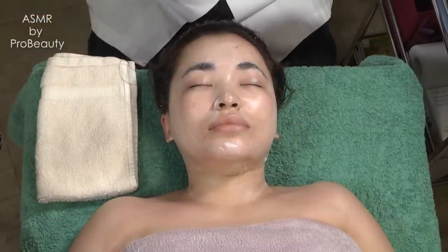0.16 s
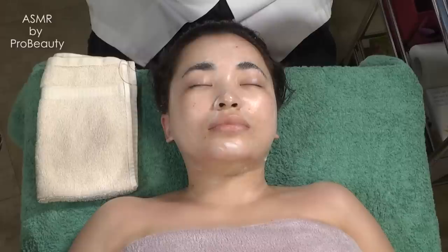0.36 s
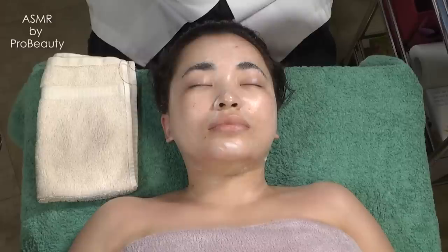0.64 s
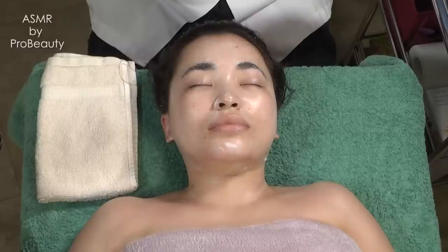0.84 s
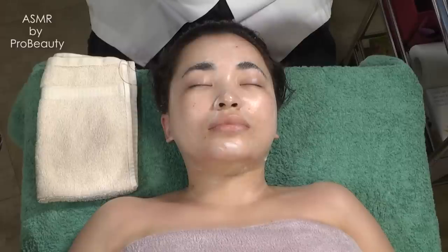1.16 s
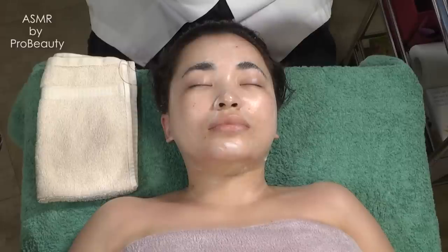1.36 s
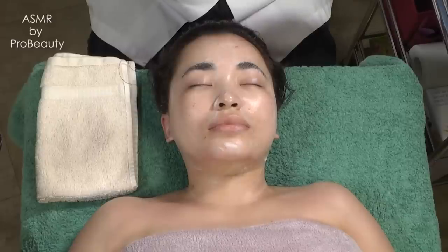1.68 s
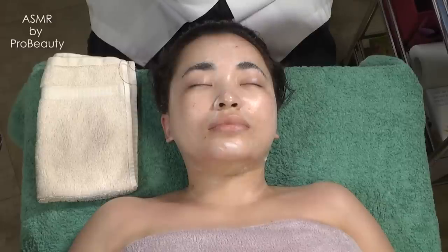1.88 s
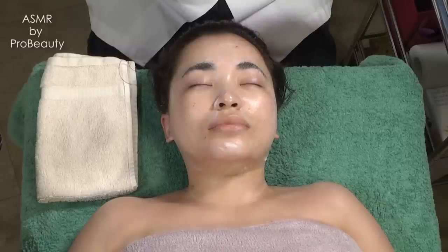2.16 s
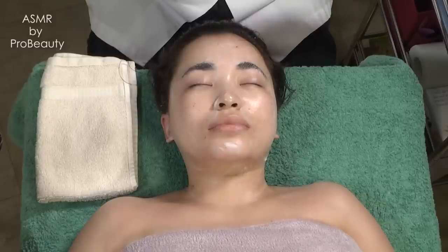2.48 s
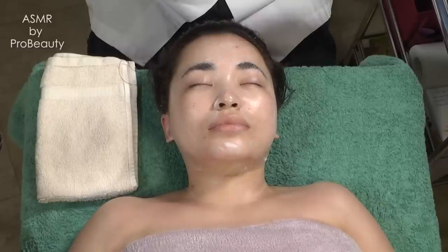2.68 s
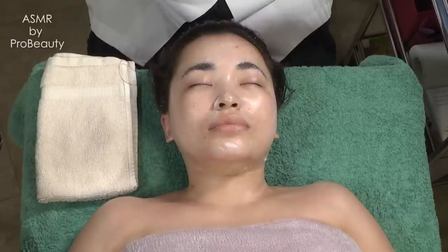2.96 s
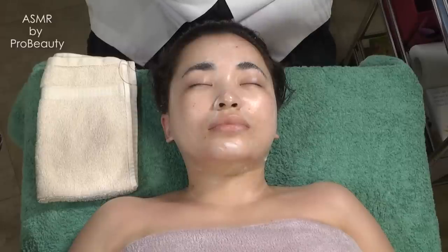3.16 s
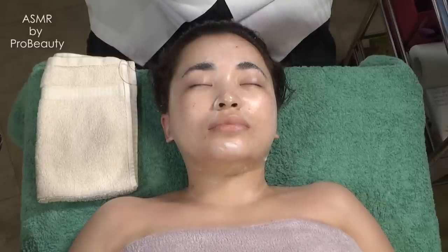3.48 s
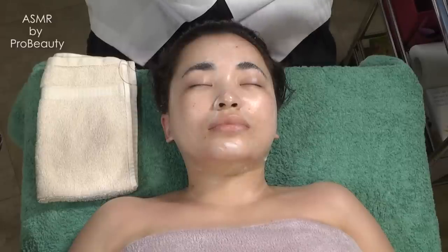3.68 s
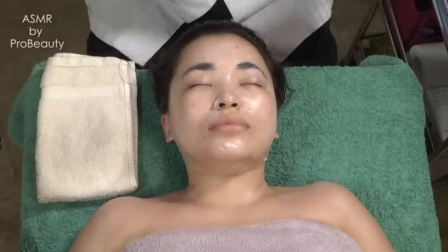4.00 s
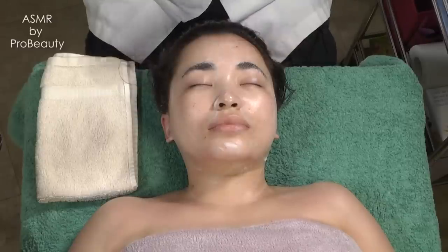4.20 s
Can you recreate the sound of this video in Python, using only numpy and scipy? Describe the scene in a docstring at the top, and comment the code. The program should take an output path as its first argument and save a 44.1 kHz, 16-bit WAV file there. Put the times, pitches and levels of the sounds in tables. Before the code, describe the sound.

In a quiet, hard-walled room, a few faint drips and a soft swirl come first. Then wet sponges are squeezed over a basin, right of centre: sharp foam snaps, ringing drops and fine fizz in a dense cluster. It thins and stops, and a cotton coat rustles close by over low ventilation rumble and microphone hiss.

```python
"""Wet sponges squeezed over a basin

Wet sponges are squeezed out to the right, in a quiet hard room. Drops splat and leave ringing bubbles,
pockets close with a rising sine, swirling water is ticks through a sliding resonance; foam snaps and crackles.
Basin bounces, a far-wall echo and a diffuse tail surround the water.
A cotton coat rustles as shaped noise, with two dull bumps, over steady ventilation rumble and hiss."""
import sys
import numpy as np
from scipy import signal
from scipy.fft import rfft, irfft, next_fast_len
from scipy.io import wavfile
from scipy.ndimage import uniform_filter1d

SR = 44100
rng = np.random.default_rng(int(sys.argv[2]) if len(sys.argv) > 2 else 0)


def generate_wav(signal):
    """Clip the signal to [-1, 1] and save it as 16-bit WAV at the path in sys.argv[1]."""
    frames = np.transpose(np.atleast_2d(signal))
    scaled = np.clip(frames, -1, 1) * 32767
    pcm = np.round(scaled).astype(np.int16)
    wavfile.write(sys.argv[1], SR, pcm)


N = 191173


def gain_of(db):
    """Decibels to amplitude factor."""
    return 10 ** (np.asarray(db) / 20)


def evened(x):
    """Scale to unit RMS."""
    return x / np.sqrt(np.mean(x ** 2) + 1e-30)


def read(points, hz, axis=1):
    """Read one table column over log frequency."""
    rows = np.transpose(points)
    return np.interp(np.log(hz + 1), np.log(rows[0] + 1), rows[axis])


def add(mix, start_s, sound):
    """Mix a sound in place, cut at the end of the mix."""
    part = mix[round(start_s * SR):][:len(sound)]
    part += sound[:len(part)]


def coloured(x, points, scale=1):
    """Zero-phase filter following a (Hz, dB) curve."""
    size = next_fast_len(N)
    gain = gain_of(scale * read(points, np.fft.rfftfreq(size, 1 / SR)))
    return irfft(rfft(x, size) * gain, size)[..., :N]


def delayed(x, delay_s):
    """Fractional delay as a linear phase slope."""
    size = next_fast_len(N)
    phase = np.exp(-2j * np.pi * np.fft.rfftfreq(size, 1 / SR) * delay_s)
    return irfft(rfft(x, size) * phase, size)[:N]


def pair(likeness):
    """Two noise channels with the given likeness over frequency."""
    size = next_fast_len(N)
    a, b = rfft(rng.standard_normal((2, size)))
    c = np.clip(read(likeness, np.fft.rfftfreq(size, 1 / SR)), -1, 1)
    return irfft(np.array([a, c * a + np.sqrt(1 - c ** 2) * b]), size)[:, :N]


def ring(start_hz, t60_s, rise_octaves, swell_cycles):
    """Dying sine that swells over its first turns; any pitch rise spans t60."""
    t = np.arange(3000) / SR
    pitch_hz = start_hz * 2 ** (rise_octaves * np.minimum(t / t60_s, 1))
    turns = np.cumsum(np.minimum(pitch_hz, 17000)) / SR
    swell = np.minimum(t * start_hz / swell_cycles, 1)
    return np.sin(2 * np.pi * turns) * gain_of(-60 * t / t60_s) * swell


# ringing bubbles: start_s, level_db, start_pitch_hz
BUBBLE_HITS = [(0.118, -47.5, 5460), (0.2132, -51, 2770), (0.2161, -48, 6100), (0.2817, -50, 5840),
               (0.32, -52, 1470), (0.4819, -55.5, 2770), (0.541, -48.5, 2810), (0.575, -53, 3330),
               (0.591, -54, 2960), (0.685, -61, 1060), (1.266, -42.5, 1790), (1.2823, -48, 2770),
               (1.287, -51.5, 4000), (1.3912, -47, 2460), (1.392, -60, 800), (1.5028, -49, 1400),
               (1.525, -40.5, 2730), (1.54, -46, 4000), (1.662, -52, 2900), (1.692, -47.5, 3120),
               (1.725, -39.5, 3460), (1.7253, -40.5, 4080), (1.742, -52.5, 1410), (1.772, -52.5, 1390),
               (1.9267, -49, 1880), (1.947, -51, 1280), (2.049, -54, 716), (2.0567, -32.5, 2420),
               (2.0686, -30, 1325), (2.0697, -29.5, 1560), (2.114, -33.5, 1360), (2.1398, -33.5, 1540),
               (2.162, -39.5, 1190), (2.2363, -38.5, 1210), (2.306, -34, 1475), (2.3056, -37, 3410),
               (2.3225, -34, 1360), (2.3392, -37.5, 4200), (2.349, -29, 1000), (2.39, -39, 1350),
               (2.425, -40.5, 964), (2.4264, -50, 2530), (2.4451, -38, 2660), (2.456, -35, 973),
               (2.498, -36, 987), (2.5475, -37, 4740), (2.523, -36, 5590), (2.549, -36, 1016),
               (2.658, -40.5, 5000), (2.673, -46.5, 1820), (2.7384, -45, 1700), (2.772, -40, 3630),
               (2.7811, -38, 3140), (2.7932, -38.5, 2660), (2.7933, -36.5, 1990), (2.837, -42.5, 858),
               (2.8368, -29, 1608), (2.858, -42.5, 800), (2.8632, -33.5, 3200), (2.906, -40.5, 1585),
               (2.9295, -38, 3430), (3.0648, -36.5, 4000), (3.0676, -23, 3245), (3.183, -39.5, 980),
               (3.1824, -36, 2700), (3.1841, -28, 1790), (3.252, -34, 831), (3.321, -36.5, 1565),
               (3.32, -29.5, 887), (3.3417, -35, 3700), (3.3413, -31, 4570), (3.49, -46, 1190)]
BUBBLE_CYCLES = 31.5  # t60 in periods of the starting pitch


def bubbles():
    """Each drop makes a small dull splat; its trapped air rings, climbing as it nears the surface."""
    out = np.zeros(N)
    splat_decay = gain_of(-60 * np.arange(300) / SR / 0.0065)
    splats = rng.standard_normal((len(BUBBLE_HITS), 300)) * splat_decay
    for (start_s, level_db, hz), splat in zip(BUBBLE_HITS, splats):
        tone = ring(hz, BUBBLE_CYCLES / hz, rise_octaves=hz / 13000, swell_cycles=1.4)
        add(out, start_s, gain_of(level_db) * tone)
        # larger drops splat lower
        low_pole = np.exp(-2 * np.pi * 2.54 * hz / SR)
        high_pole = np.exp(-2 * np.pi * 1.13 * hz / SR)
        dull = signal.lfilter([(1 - low_pole) ** 2], [1, -2 * low_pole, low_pole ** 2], splat)
        banded = signal.lfilter([1, -2, 1], [1, -2 * high_pole, high_pole ** 2], dull)
        splat_db = level_db - 2 - 1.8 * np.log2(hz / 1500)
        add(out, start_s, gain_of(splat_db) * banded)
    return out


# snapping foam cells: tear_start_s, level_db, start_pitch_hz
SNAP_HITS = [(.038, -53, 9400), (0.271, -33.5, 12000), (.442, -42, 12000), (1.063, -49, 8300),
             (1.244, -46, 10500), (1.4979, -35.5, 10050), (1.571, -34.5, 9100), (1.606, -35, 10000),
             (1.6594, -33.5, 7900), (1.7194, -30.5, 9400), (1.739, -28, 10400), (1.841, -33.5, 7300),
             (1.929, -29, 9000), (1.9475, -20.5, 9400), (1.955, -28.5, 6870), (2.055, -34, 6540),
             (2.0679, -23, 9000), (2.1162, -20.5, 14100), (2.1573, -32, 7800), (2.1704, -19, 8150),
             (2.2636, -36.5, 9550), (2.2764, -23.5, 6650), (2.306, -29.5, 5200), (2.348, -27.5, 7750),
             (2.4163, -23, 15100), (2.447, -31.5, 10200), (2.5237, -20.5, 11000), (2.5484, -24, 10400),
             (2.626, -32, 7250), (2.647, -23, 9750), (2.67, -27, 10500), (2.7038, -29.5, 10260),
             (2.7243, -44, 10830), (2.7798, -18, 12000), (2.7928, -25, 11900), (2.9294, -20.5, 7570),
             (3.008, -34, 10300), (3.05, -53, 7560), (3.0646, -20.5, 8820), (3.0667, -15.5, 10650),
             (3.1832, -26.5, 7230), (3.268, -34, 8700), (3.34, -25.5, 9830), (3.496, -24, 10900),
             (3.545, -38, 10900), (3.6107, -38, 8800), (4.2934, -46, 7760)]
TEAR_S = 0.0011  # tear to burst
CRACK_DB, CRACK_DB_PER_OCTAVE = -10, -4.5  # crack re ring at 8 kHz; smaller cells crack less


def snaps():
    """The film tears faintly, then the cell bursts: a few cycles of ring inside a wide crack."""
    out = np.zeros(N)
    crack_decay = gain_of(-60 * np.arange(300) / SR / 0.0029)
    cracks = np.diff(rng.standard_normal((len(SNAP_HITS), 301))) * crack_decay
    for (start_s, level_db, hz), crack in zip(SNAP_HITS, cracks):
        crack_db = CRACK_DB + CRACK_DB_PER_OCTAVE * np.log2(hz / 8000)
        tone = ring(hz, 19 / hz, rise_octaves=0.17, swell_cycles=2.78)[:300]
        pop = gain_of(level_db) * (tone + gain_of(crack_db) * crack)
        add(out, start_s, gain_of(-21.5) * pop)
        add(out, start_s + TEAR_S, pop)
    return out


# foam as the hands tighten and ease: time_s, fizz_db, gurgle_db
SQUEEZE_LEVELS = [(0.0, -82, -82.5), (0.54, -89, -75.5), (1.3, -84.5, -95), (1.6, -72.5, -73.5),
                  (1.8, -66, -72), (1.97, -61.5, -67.5), (2.12, -61, -68), (2.45, -61.5, -64),
                  (2.68, -66.5, -69), (2.85, -63.5, -61.5), (3.11, -64.5, -93), (3.31, -67, -88),
                  (3.619, -79.5, -81.5), (3.9, -80.5, -95)]


def crackle(per_s, spread_db, low_hz, high_hz, cycles, column):
    """Many tiny cells pop at random, a few of them loud, more strongly as the hands tighten."""
    size = gain_of(spread_db * np.minimum(rng.exponential(1, N), 3))
    pops = size * (rng.random(N) < per_s / SR)
    kind = rng.integers(0, 32, N)
    out = np.zeros(N)
    for k, hz in enumerate(np.geomspace(low_hz, high_hz, 32)):
        cell = ring(hz, cycles / hz, rise_octaves=0.38, swell_cycles=1.53)[:1200]
        out += signal.oaconvolve(pops * (kind == k), cell)[:N]
    rows = np.transpose(SQUEEZE_LEVELS)
    level_db = np.interp(np.arange(N) / SR, rows[0], rows[column], right=-120)
    return gain_of(level_db) * evened(out)


# cavities closing up: start_s, level_db, start_pitch_hz, length_s, rise_octaves
BLOOP_HITS = [(3.453, -44.5, 766, 0.0153, 0.93), (3.478, -59, 1227, .038, 1)]


def bloops():
    """The pitch sweeps up as the air pocket shrinks."""
    out = np.zeros(N)
    for start_s, level_db, hz, length_s, rise_octaves in BLOOP_HITS:
        u = np.linspace(0, 1, round(length_s * SR))
        turns = np.cumsum(hz * 2 ** (rise_octaves * u)) / SR
        envelope = np.sin(np.pi * u ** 0.52)
        add(out, start_s, gain_of(level_db) * np.sin(2 * np.pi * turns) * envelope)
    return out


# water swirling in the basin, one list a swirl: time_s, level_db, pitch_hz
SWIRL_PATHS = [
    [(.27, -71, 1340), (.33, -90, 1470), (.45, -73.5, 1800), (.58, -79, 3550), (.69, -81, 2900),
     (.85, -79, 2420)],
    [(.65, -83, 1100), (.78, -70.5, 1070), (1.0, -86, 1110)],
]


def swirls(width_hz=700, per_s=150):
    """Small uneven ticks excite a loose resonance that slides with the water level."""
    t, out = np.arange(N) / SR, np.zeros(N)
    pole = np.exp(-np.pi * width_hz / SR)
    for path in SWIRL_PATHS:
        time_s, level_db, pitch_hz = np.transpose(path)
        ticks = rng.standard_normal(N) * (rng.random(N) < per_s / SR)
        turn = np.exp(2j * np.pi * np.cumsum(np.interp(t, time_s, pitch_hz)) / SR)
        # shift to 0 Hz, smooth with a double pole, shift back
        smooth = signal.lfilter([1], np.convolve([1, -pole], [1, -pole]), ticks / turn)
        level = gain_of(np.interp(t, time_s, level_db, left=-150, right=-150))
        out += level * evened((turn * smooth).real)
    return out


def basin(x):
    """Rim, hands and water throw back a tight cluster of bounces within a few milliseconds."""
    taps = np.zeros(260)
    at = np.arange(20, 240, 20) + rng.integers(0, 20, 11)
    taps[at] = rng.choice([-1., 1.], 11) * gain_of(-8 - 60 * at / SR / 0.012)
    taps = signal.lfilter(*signal.butter(1, 1800, "high", fs=SR), taps)  # small faces return little bass
    taps[0] = 1
    return signal.oaconvolve(x, taps)[:N]


# direct sound: frequency_hz, left_minus_right_db
DIRECT_LEAN = [(700, -13.5), (2500, -9), (5000, -8), (12000, -3.5)]
# lead of one port over the other: direct_right_lead_s, echo_left_lead_s
PORT_LEADS = (.000023, .00001)
# far-wall reflection: frequency_hz, gain_db
WALL_COLOUR = [(700, -12), (2000, -8.5), (4000, -3), (11000, -2.5), (15000, -14)]
WALL_S = 0.0324
# level sent to the far wall: time_s, level_db
WALL_REACH = [(.1, -8), (1.3, -13), (1.74, -4.5), (1.95, -3), (2.07, 2), (2.17, -10), (2.3, -6), (2.53, 2),
              (2.64, -4.5), (2.78, 3), (3.07, 5), (3.179, -2), (3.36, 1.5), (3.61, -3)]
# diffuse tail: frequency_hz, t60_s, level_db
ROOM_TAIL = [(700, 0.34, 1), (1990, 0.4, 0), (5360, 0.47, -0.5), (12000, 0.78, -6)]


def room(x):
    """Direct sound leans right; one clear echo from the far wall; then a sparse decaying tail."""
    near = basin(x)
    right_lead_s, left_lead_s = PORT_LEADS
    left = delayed(coloured(near, DIRECT_LEAN, scale=1 / 2), right_lead_s)
    direct = np.array([left, coloured(near, DIRECT_LEAN, scale=-1 / 2)])

    # hands and arms shade the path to the wall by turns
    time_s, reach_db = np.transpose(WALL_REACH)
    reach = gain_of(np.interp(np.arange(N) / SR, time_s, reach_db))
    far = coloured(near * reach, WALL_COLOUR)
    echo = np.array([delayed(far, WALL_S - left_lead_s), delayed(far, WALL_S)])

    taps = np.zeros((2, SR // 2))
    at = np.arange(120, SR // 2 - 20, 20) + rng.integers(0, 20, (3, (SR // 2 - 121) // 20))
    signs = rng.choice([-1., 1.], at.shape)
    np.put_along_axis(taps, at[:2], signs[:2], 1)
    taps[:, at[2]] += 0.95 * signs[2]  # reflections that reach both ports alike

    hz, t, z = signal.stft(taps, SR, nperseg=128)
    t60_s = np.maximum(read(ROOM_TAIL, hz), 0.05)[:, None]
    tail_db = read(ROOM_TAIL, hz, axis=2)[:, None]
    build_up = np.minimum(0.55 + t / 0.023, 1)
    tap_norm = np.sqrt(t60_s * SR / 20 * 2 / np.log(1e6))  # offsets tap density and decay length
    z = z * build_up * gain_of(-60 * t / t60_s + tail_db) / tap_norm
    tail = signal.istft(z, SR, nperseg=128)[1]
    diffuse = signal.fftconvolve(x[None], tail, axes=1)[:, :N] * gain_of([[-1], [1]])
    return direct + echo + diffuse


# one list a rustle: time_s, hiss_db, body_re_hiss_db
COAT_RUSTLES = [
    [(0, -88, -5), (.62, -71, -3.5), (.77, -60.5, -41), (.93, -74, -24)],
    [(3.8, -82, -3), (4.018, -55, -2), (4.2, -61.5, 1.5), (4.335, -59, 0.5)],
]
# hiss spectrum: frequency_hz, relative_density_db
HISS_COLOUR = [(1500, -19), (3000, -1.5), (8000, 1), (11000, -5), (14000, -6), (16000, -23)]
# body spectrum: frequency_hz, relative_density_db
BODY_COLOUR = [(200, -20), (330, -6), (700, -1), (1200, -4.5), (2500, -8.5), (5000, -31)]


def coat():
    """Cloth slides on cloth: a hiss and a duller body, both slightly grainy."""
    t, out = np.arange(N) / SR, np.zeros((2, N))
    grain = gain_of(2.0 * evened(uniform_filter1d(rng.standard_normal(N), 300)))
    fibres = pair([(100, 0.78), (16000, 0.53)]) * grain  # frequency_hz, likeness
    hiss, body = evened(coloured(fibres, HISS_COLOUR)), evened(coloured(fibres, BODY_COLOUR))
    for rows in COAT_RUSTLES:
        time_s, hiss_db, body_db = np.transpose(rows)
        level = gain_of(np.interp(t, time_s, hiss_db, left=-150, right=-150))
        out += level * (hiss + gain_of(np.interp(t, time_s, body_db)) * body)
    return out


# soft dull bumps amid the rustle: start_s, level_db, pitch_hz
THUMP_HITS = [(4.075, -49, 624), (4.203, -47, 326)]


def thumps():
    """A few damped low cycles at steady pitch."""
    out = np.zeros(N)
    for start_s, level_db, hz in THUMP_HITS:
        add(out, start_s, gain_of(level_db) * ring(hz, 14 / hz, rise_octaves=0, swell_cycles=1.0))
    return out


# background spectrum: frequency_hz, relative_density_db
AIR_COLOUR = [(12, -84), (20, -26), (98, -5), (172, -10), (216, -15), (262, -13.5), (527, -19),
              (590, -17.5), (873, -17), (1400, -20.5), (4000, -29), (8890, -21.5), (13000, -19.5),
              (16000, -19.5)]
# background stereo: frequency_hz, left_right_likeness
AIR_LIKENESS = [(25, 0.26), (60, 0.99), (240, 0.19), (950, 0.26), (3770, 0.019), (15000, 0.074)]
AIR_DB = -63  # RMS, before the 1 dB lean to the right


def air():
    """Ventilation rumble and microphone hiss: steady shaped noise."""
    noise = evened(coloured(pair(AIR_LIKENESS), AIR_COLOUR))
    return gain_of(AIR_DB) * noise * gain_of([[-0.5], [0.5]])


# colour of all water and foam sounds: frequency_hz, gain_db
WET_COLOUR = [(450, -12), (750, -3), (1500, -0.5), (11500, 6.5), (14000, 4.5), (16000, 0)]


def scene():
    """Water and foam in the room; coat, bumps and air added dry."""
    fizz = crackle(per_s=750, spread_db=5.5, low_hz=3200, high_hz=13860, cycles=25, column=1)
    gurgle = crackle(per_s=560, spread_db=8.0, low_hz=1390, high_hz=4000, cycles=9.3, column=2)
    water = bubbles() + bloops() + snaps() + swirls() + fizz + gurgle
    return room(coloured(water, WET_COLOUR)) + coat() + thumps() + air()


EDGE_HZ = 15900


def record(dry):
    """Band limit of the recorder: linear-phase low-pass."""
    low_pass = signal.firwin(511, EDGE_HZ, window=("kaiser", 9), fs=SR)
    return signal.oaconvolve(dry, low_pass[None], "same")


dry = scene()
out = record(dry)
generate_wav(out)
```